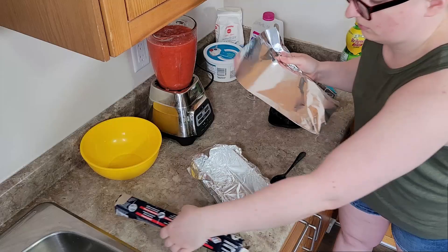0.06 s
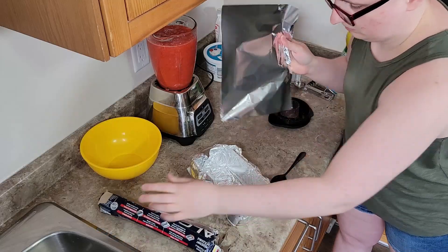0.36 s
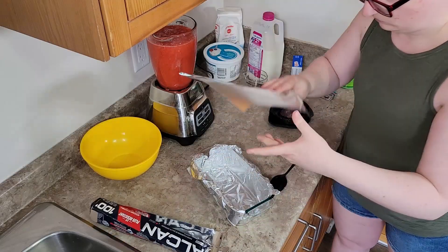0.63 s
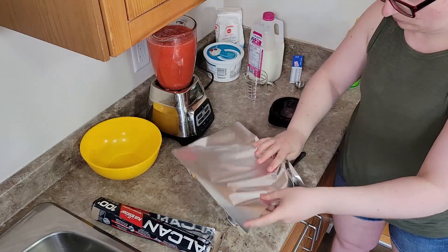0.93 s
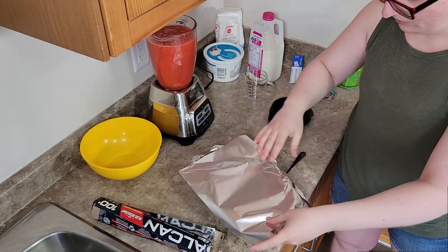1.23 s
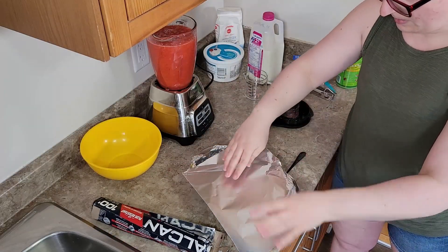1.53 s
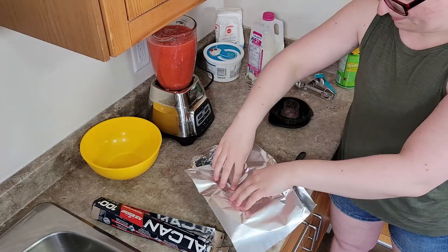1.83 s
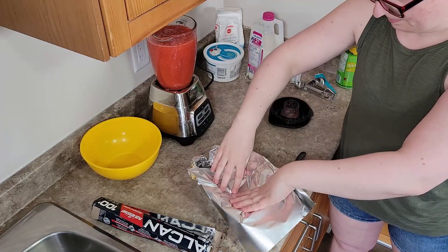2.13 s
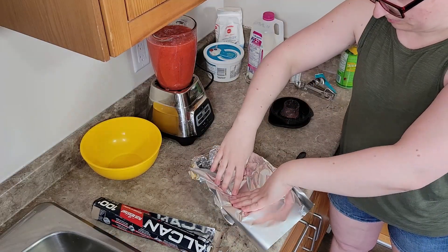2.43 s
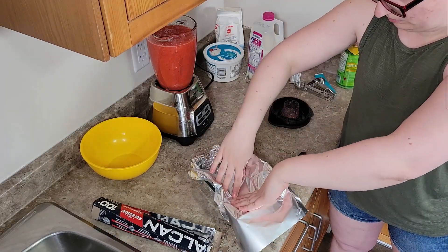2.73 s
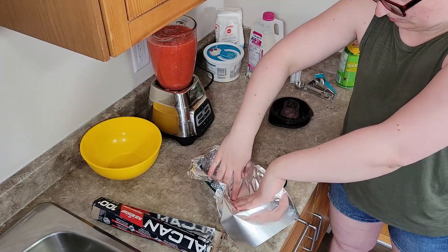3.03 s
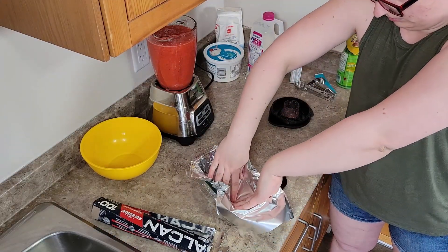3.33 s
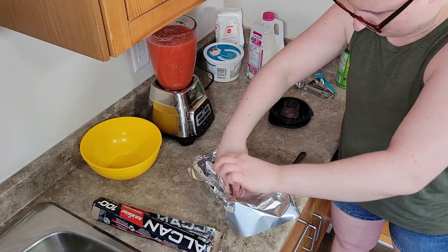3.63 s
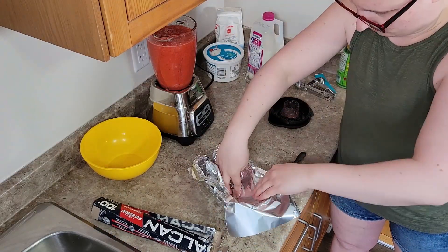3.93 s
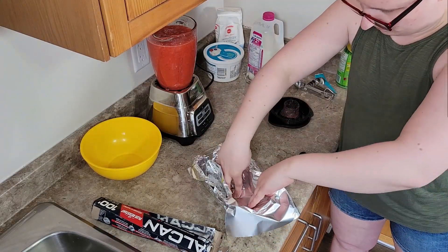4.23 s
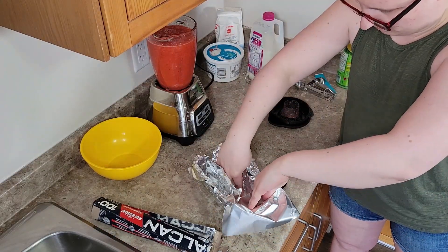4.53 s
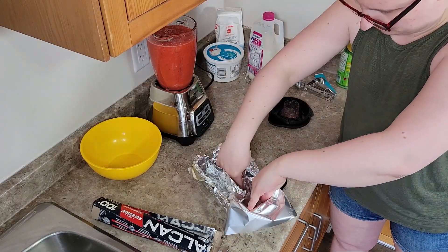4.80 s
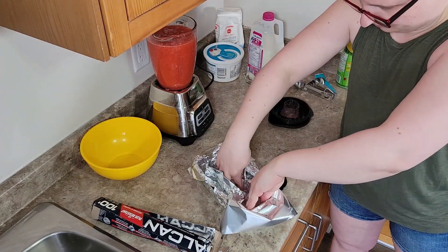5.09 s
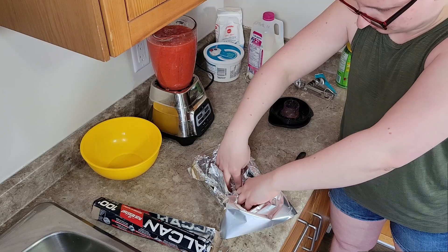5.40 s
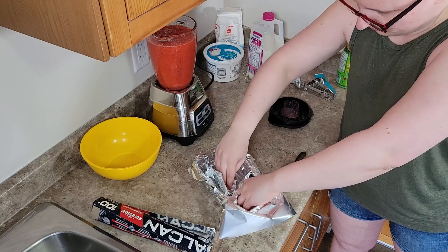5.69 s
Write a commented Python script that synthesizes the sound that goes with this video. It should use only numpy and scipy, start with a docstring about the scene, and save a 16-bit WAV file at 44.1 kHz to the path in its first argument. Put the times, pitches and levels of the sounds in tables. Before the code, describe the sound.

Aluminum foil crinkles and crackles as hands press it over a dish, with a few soft knocks on a kitchen counter.

```python
"""Foil over a baking dish

Close up in a small kitchen, a sheet of aluminium foil is swung over a dish and pressed in by hand.
Creases snap in dense swarms and ring the facets of the sheet; now and then a whole fold buckles.
The cardboard foil box is put down first; later the dish bumps and judders on the counter."""
import sys
import numpy as np
from scipy import signal
from scipy.fft import rfft, irfft
from scipy.io import wavfile
from scipy.ndimage import uniform_filter1d

SR = 44100
rng = np.random.default_rng(int(sys.argv[2]) if len(sys.argv) > 2 else 0)


def transcribe(u):
    """Save the signal u as a 16-bit wav file named by the first command-line argument.

    u: samples, shape (n,) or (channels, n), limited to [-1, 1]; the rate is SR.
    q: integer samples, one column per channel.
    """
    v = np.clip(np.atleast_2d(u).T, -1, 1)
    q = np.round(v * 32767).astype(np.int16)
    wavfile.write(sys.argv[1], SR, q)


N = 262425
HZ = np.fft.rfftfreq(N, 1 / SR)
TOP_HZ = 8950


def gain_of(db):
    """Decibels to amplitude."""
    return 10 ** (np.asarray(db) / 20)


def unit_rms(x):
    """Scales to an rms of one."""
    return x / np.sqrt(np.mean(x ** 2) + 1e-20)


def value_at(points, hz):
    """Reads a table on a log-frequency axis."""
    f, value = np.transpose(points)
    return np.interp(np.log(hz + 1), np.log(f + 1), value)


def add(mix, start_s, sound):
    """Mixes a sound in at its start time."""
    part = mix[max(round(start_s * SR), 0):][:len(sound)]
    part += sound[:len(part)]


def coloured(x, points):
    """Filters x by a table of levels."""
    return irfft(rfft(x) * gain_of(value_at(points, HZ)), N)


def steadied(x, span_s):
    """Takes out swells slower than span_s and leaves the grain."""
    size = int(span_s * SR)
    power = uniform_filter1d(uniform_filter1d(x ** 2, size), size)
    return x / np.sqrt(power + 1e-6 * np.mean(x ** 2))


# Spectrum of the quiet kitchen: frequency_hz, level_db
ROOM_TONE = [(29, -36), (50, -2), (139, -16), (608, -7), (1140, -4), (1240, -23.5), (1450, -6.5),
             (1960, -3.5), (5820, -8.5), (8980, -32), (11700, -63), (19800, -120)]

def room_tone():
    """A faint, steady hiss lies behind everything."""
    return gain_of(-80) * unit_rms(coloured(rng.standard_normal(N), ROOM_TONE))


# Hand strokes that lay the sheet down, press it in, shift the dish and tuck in the edges:
# full_strength_s, rise_20db_s, hold_s, level_db, change_while_held_db, tiny_db, wide_db, push_db
# (the last three are relative to level_db, the level of ordinary creases)
STROKES = [ (.02, 0.2, .13, -72.5, 1.5, -4, -7, -13), (.182, 0.038, 0.194, -42.5, -8.5, -3.5, -8, -11),
           (0.433, 0.026, 0.235, -43.5, -6.5, 0, -14, -20), (.762, 0.0521, .16, -51.5, 1, 0.5, -15, -19.5),
           (1.029, 0.0424, 0.1098, -49, -5.5, 2, -10.5, -15.5),
           (1.21, 1.48, 0.21, -71, -2.5, -3.5, -4, -11), (1.54, 0.1331, .08, -60, -7.5, 2.5, -12.5, -15),
           (1.768, 0.026, 0.157, -42.5, -3.5, 2.5, -7, -9.5),
           (1.91, 0.0423, 0.1297, -49, 2.5, 1.5, -1.5, -9),
           (2.083, 0.048, 0.0864, -53.5, 1, 3, -10.5, -5.5), (2.2, 0.1767, 0.0743, -63, 1, -2.5, -3, -5.5),
           (2.364, 0.0576, 0.0178, -56.5, -3.5, -3.5, -6, -11),
           (2.48, 0.28, 0.074, -64.5, -1.5, -4.5, -5.5, -14.5),
           (2.583, 0.0864, 0.0513, -56.5, 1, -4.5, -6.5, -8),
           (2.684, 0.0112, 0.1472, -49.5, -9, -1.5, -8, -11),
           (2.871, 0.0187, 0.1088, -52, -1.5, -4.5, -4.5, -9), (3.015, 0.02, .22, -49, 1, -1.5, -6, -12.5),
           (3.295, 0.014, .23, -54.5, -17, -3, -3, -11), (3.578, 0.0189, 0.0804, -43.5, -2.5, -3, -13, -9),
           (3.733, 0.0341, 0.0243, -54, -4, 3.5, -7, 0.5), (3.807, 0.07, 0.0196, -50.5, -5, -5, -7, 1),
           (4.034, 0.0223, 0.0316, -41.5, -3, -2, -5, -16.5), (4.203, 0.0146, 0.0549, -52, 5, -.5, -5, -17),
           (4.32, 0.06, 0.033, -62.5, 1.5, -4.5, -3, -11.5),
           (4.363, 0.0014, 0.0557, -48, -2, -1.5, -7, -10), (4.514, 0.0282, 0.026, -55, 1, 1, -8.5, -12.5),
           (4.591, 0.0256, 0.0274, -50.5, -5.5, 4, -6, -13.5), (4.772, .07, .087, -54, 4.5, .5, -7, -17.5),
           (4.961, 0.0707, 0.0681, -43.5, -8, -.5, -8, -10.5),
           (5.14, .014, .054, -48, -4, -3.5, -8.5, -16.5), (5.21, 0.0233, 0.0615, -46.5, -1, -2, -6, -12.5),
           (5.298, 0.0418, 0.173, -45, -6, -2, -8.5, -18), (5.514, 0.11, 0.21, -51, 1, -2, -5.5, -17),
           (5.745, 0.1276, 0.19, -50, -3.5, -4, -4.5, -10.5)]

def hand_strokes(release_db_per_s=240):
    """Each stroke swells, holds and lets go: envelopes for wide panels, creases, tiny creases, push."""
    t = np.arange(0, N / SR, 1 / 1000)
    power = np.zeros((4, len(t)))
    for full_s, rise_s, hold_s, db, change_db, tiny_db, wide_db, push_db in STROKES:
        early = np.maximum(full_s - t, 0)
        held = np.clip((t - full_s) / hold_s, 0, 1)
        late = np.maximum(t - full_s - hold_s, 0)
        stroke = gain_of(db - 20 * early / rise_s + change_db * held - release_db_per_s * late)
        power += np.outer(gain_of([wide_db, 0, tiny_db, push_db]), stroke) ** 2
    return [np.interp(np.arange(N) / SR, t, np.sqrt(p)) for p in power]


def facet_snaps(flurries_per_s, spread_db, flurry_s, median_t60_s, tick, count=6):
    """Each facet snaps back and forth in a flurry, every snap a tick and a brief ring at its pitch."""
    t = np.arange(640) / SR
    draws = rng.random((5000, 3 + 2 * count))[:int(flurries_per_s * N / SR)]
    when, facet, sustain = draws[:, :3].T[:, :, None]
    delay, size = np.split(-np.log(draws[:, 3:]), 2, axis=1)
    pitch_hz = 450 + 8400 * facet
    t60_s = median_t60_s * 4 ** (sustain - .5)
    snaps = np.sin(2 * np.pi * pitch_hz * t) * gain_of(-60 * t / t60_s)
    snaps /= np.linalg.norm(snaps, axis=1, keepdims=True)
    snaps[:, 0] += tick
    heights = gain_of(spread_db * np.minimum(size, 3.5)) * (-1) ** np.arange(count)
    out = np.zeros(N)
    for snap, starts, flurry in zip(snaps, when * N / SR + flurry_s * delay, heights):
        for start_s, height in zip(starts, flurry):
            add(out, start_s, height * snap)
    return out


def near_echoes(x, strength=0.99, fade_s=0.0216, count=24):
    """First echoes off counter, wall and cupboards; their pattern shifts as hands and foil move."""
    out = x.copy()
    for place in range(4):
        delay_s = rng.uniform(.001, .028, count)
        taps = rng.choice([-1, 1], count) * np.exp(-delay_s / fade_s)
        response = np.bincount((delay_s * SR).astype(int), strength * taps / np.linalg.norm(taps))
        crossfade = np.maximum(np.cos(2 * np.pi * (1.3 * np.arange(N) / SR + place / 4)), 0)
        out += signal.oaconvolve(x * crossfade, response)[:N]
    return out


# Resonances of the sheet lying in the dish: pitch_hz, width_hz, level_db
HOLLOW_MODES = [(724, 60, -11), (2107.7, 53, 1), (3580, 80, -4.5), (3927, 160, -1), (5161, 37, 1),
                (6100, 29, -17.5), (6110, 23, -4), (7978, 170, 0)]
# Colour of the foil at the microphone: frequency_hz, level_db
FOIL_SPECTRUM = [(250, -26.5), (430, -15), (700, -3.5), (850, -3.5), (1020, -6.5), (1350, -6), (2000, -1),
                 (2450, -4), (2900, 1.5), (4000, -1.5), (4600, -0.5), (5600, 2), (7500, 1), (8300, -10),
                 (8900, -20)]

def sheet(snaps):
    """Snaps take the colour of the hollow of the dish, the nearest surfaces and the foil."""
    hollow = 1 + sum(gain_of(db) / (1 + 2j * (HZ - hz) / width) for hz, width, db in HOLLOW_MODES)
    return coloured(near_echoes(irfft(rfft(snaps) * hollow, N)), FOIL_SPECTRUM)


def by_size(x):
    """Splits foil sound, low to high, into wide panels, ordinary creases and tiny creases."""
    above = [1 / (1 + (edge_hz / (HZ + 1)) ** 12) for edge_hz in (430, 2450, 5300)]
    return [irfft(rfft(x) * band, N) for band in (above[0] - above[1], above[1] - above[2], above[2])]


def crinkling(envelopes):
    """Creases crackle under the fingers, each size following the strokes."""
    swarm = facet_snaps(flurries_per_s=760, spread_db=2.5, flurry_s=.007,
                        median_t60_s=0.02256, tick=0.651)
    bands = by_size(sheet(swarm))
    return sum(envelope * steadied(band, span_s=0.032) for envelope, band in zip(envelopes, bands))


# Boost or cut of the widest panels: time_s, gain_db
PANEL_GAINS = [(.4, -2.5), (1.0, 1), (1.8, 4), (2.8, 4), (3.6, 0), (4.3, -4), (5.2, -5), (5.9, -1)]

def drumming(foil, below_hz=945):
    """The widest panels drum while the sheet spans the dish and fade as it is crumpled in."""
    lows = irfft(rfft(foil) / (1 + (HZ / below_hz) ** 10), N)
    gain = gain_of(np.interp(np.arange(N) / SR, *np.transpose(PANEL_GAINS)))
    return foil + (gain - 1) * lows


# Rumble of the counter under the dish: frequency_hz, level_db
COUNTER_SPECTRUM = [(40, -23), (75, -20), (110, -3.5), (165, -11), (265, 4), (330, -8), (400, -6),
                    (520, -20), (900, -32.5)]

def counter_rumble(push):
    """Fingers shove the foil against the dish, and the counter rumbles softly."""
    return push * steadied(coloured(rng.standard_normal(N), COUNTER_SPECTRUM), span_s=0.065)


# The foil box lands and settles: start_s, level_db, hardness_db_per_octave
BOX_KNOCKS = [(0.1744, -29.5, 5), (0.1815, -35, 1.5), (0.23, -35.5, 3), (0.2491, -37, 5.5),
              (0.2569, -34, -5.5), (0.2663, -37, 5.5), (.273, -33, 2.5), (0.3, -42.5, -9)]
# Modes of the box: pitch_hz, level_db, t60_s
BOX_MODES = [(105.96, -4, 0.177), (235.1, 2.5, 0.1217), (259.25, -4.5, 0.183), (391, 1, 0.0667),
             (480.3, -18.5, 0.334), (589.5, -15, 0.1176), (645, -8.5, 0.0755), (699.3, -23, 0.222),
             (816.5, -6, 0.058), (904, -6.5, 0.0644), (1429.4, -16, 0.058)]

def box_knocks():
    """Each knock rings the cardboard box; harder corners bring out the upper modes."""
    t, out = np.arange(SR // 2) / SR, np.zeros(N)
    attack = 1 - np.exp(-t / 0.00228)
    for start_s, db, hardness in BOX_KNOCKS:
        ring = sum(gain_of(mode_db + hardness * np.log2(hz / 260) - 60 * t / t60_s)
                   * np.sin(2 * np.pi * hz * t) for hz, mode_db, t60_s in BOX_MODES)
        add(out, start_s, gain_of(db) * ring * attack)
    return out


# Folds that give way: time_s, level_db, pitch_hz, relative_ring_db
FOLDS = [(0.177, -42, 2840, -0.5), (0.233, -43, 2770, -16.5), (0.438, -40, 6630, -10.5),
         (0.49, -47, 6600, 0.5), (0.604, -48.0, 6340, 1.5), (0.845, -51, 4480, -12.5),
         (1.039, -41.0, 6540, -4.5), (1.529, -58.5, 7639, 0.5), (1.745, -55, 7320, -13.5),
         (1.782, -40, 7400, 1), (1.823, -40, 6950, -0.5), (1.907, -42, 2120, -15), (2.01, -49.5, 2600, -11),
         (2.14, -51.0, 6950, -3), (2.329, -57, 3000, -7), (2.686, -53.5, 2610, -5),
         (2.919, -52.5, 6800, -0.5), (3.019, -48.5, 3900, -9.5), (3.123, -50, 6980, -5),
         (3.229, -51.5, 7310, 2.5), (3.593, -40.0, 4527, -2.5), (3.654, -50.5, 7380, 1),
         (3.733, -52.5, 2873, 2.5), (4.029, -42.5, 2500, -13), (4.199, -55.5, 2875, 0.5),
         (4.245, -46.5, 2086, 1.5), (4.357, -52.0, 2950, -1), (4.616, -55.5, 2970, 3.5),
         (4.766, -50, 2740, -2), (4.84, -46, 7040, -10), (4.987, -49.5, 7220, -3), (5.214, -41, 6590, -8),
         (5.377, -41.5, 3900, -12), (5.452, -42, 3890, -4), (5.745, -50.5, 2180, -15.5),
         (5.856, -44.5, 2910, -15)]

def buckling(build_up_s=.009, collapse_s=0.01685):
    """A fold gives way in an avalanche of snaps that builds, dies out and rings it at its own pitch."""
    swarm = facet_snaps(flurries_per_s=780, spread_db=0, flurry_s=.007, median_t60_s=0.024, tick=0.5)
    bands = np.array([steadied(band, span_s=0.0033) for band in by_size(sheet(swarm))])
    out = np.zeros(N)
    for time_s, db, hz, ring_db in FOLDS:
        wide, creases, tiny = bands[:, round(time_s * SR):][:, :SR // 5]
        t = np.arange(len(creases)) / SR
        # a higher fold is a smaller one: fewer wide panels, more tiny creases
        octaves = np.log2(hz / 4570)
        snaps = gain_of(-8 - 4 * octaves) * wide + creases + gain_of(-2 + 8.5 * octaves) * tiny
        ring = signal.lfilter(*signal.iirpeak(hz, Q=16, fs=SR), snaps)
        fold = snaps + gain_of(ring_db) * np.std(snaps) * steadied(ring, span_s=0.0071)
        build_up = 1 - np.exp(-2 * t / build_up_s)
        collapse = np.exp(-np.maximum(t - build_up_s, 0) / collapse_s)
        add(out, time_s - build_up_s / 2, gain_of(db) * build_up * collapse * fold)
    return out


# The dish skids on the counter: start_s, level_db, pitch_hz, length_s, base_t60_s
SKIDS = [(1.037, -48.5, 239.8, 0.0103, 0.136), (1.760, -46, 277.6, 0.078, .1),
         (1.823, -18.5, 255, 0.006, 0.15), (1.967, -40, 270.9, 0.0129, 0.048),
         (2.729, -50.5, 285, 0.0131, 0.101), (3.223, -51, 247, 0.015, 0.088),
         (3.580, -34.5, 248.2, 0.0151, 0.149), (3.632, -29.5, 238.9, 0.0249, 0.015),
         (3.655, -38.5, 275.4, 0.0159, 0.054), (3.709, -38.5, 234, 0.0237, 0.051),
         (3.763, -41, 240.7, 0.024, 0.043), (3.801, -39.5, 241.4, 0.015, 0.187),
         (4.029, -50.5, 266.9, 0.0142, 0.152), (4.533, -57, 235.2, 0.0151, .042),
         (4.945, -54, 272, 0.0102, .066), (5.021, -48.5, 251.3, 0.0256, 0.066),
         (5.188, -53, 255.8, 0.06, 0.078), (5.745, -48.5, 234.4, 0.00778, 0.093)]
# Modes of the counter under the dish, rung by each skid: pitch_ratio, level_db, t60_ratio
COUNTER_MODES = [(.48, -15, 1.7), (.72, -12, 0.703), (1, 1.5, 0.58), (1.15, -16, 1), (1.45, -15.5, 1.46)]

def dish_skids():
    """Friction keeps the counter sounding under the dish, rising a little in pitch as it grips; then it rings
    out."""
    t, out = np.arange(SR // 2) / SR, np.zeros(N)
    grip = 1 - np.exp(-(t / 0.00304) ** 2)
    for start_s, db, hz, length_s, base_t60_s in SKIDS:
        waver = unit_rms(uniform_filter1d(rng.standard_normal(len(t)), size=400))
        cycles = np.cumsum(hz * (1 + 0.04 * waver + 0.044 * np.minimum(t / length_s, 1))) / SR
        decay_db = 60 * np.maximum(t - length_s, 0) / base_t60_s
        ring = sum(gain_of(mode_db - decay_db / t60_ratio) * np.sin(2 * np.pi * ratio * cycles)
                   for ratio, mode_db, t60_ratio in COUNTER_MODES)
        add(out, start_s, gain_of(db) * grip * ring)
    return out


# Reverberation of the small kitchen: frequency_hz, t60_s
KITCHEN_DECAY = [(100, 0.41), (500, 0.83), (2000, 0.1), (5000, 0.33), (9000, 0.29)]

def kitchen_reverb(x):
    """The room returns a diffuse tail, each band dying at its own speed."""
    hz, t, noise = signal.stft(rng.standard_normal(SR * 2 // 3), SR, nperseg=256)
    fade = gain_of(-60 * t / value_at(KITCHEN_DECAY, hz)[:, None]) * (1 - np.exp(-t / 0.0033))
    tail = signal.istft(noise * fade, SR, nperseg=256)[1]
    return signal.oaconvolve(x, tail / np.linalg.norm(tail))[:N]


def scene():
    """Foil, box and dish close to one microphone, with the kitchen well behind them."""
    *envelopes, push = hand_strokes()
    foil = drumming(crinkling(envelopes) + buckling())
    knocks = box_knocks() + dish_skids()
    reverb = kitchen_reverb(gain_of(-16) * foil + gain_of(-21.5) * knocks)
    return (room_tone() + foil + counter_rumble(push) + knocks + reverb)[None]


def record(dry):
    """The mono microphone sheds deep bass, and the treble ends at TOP_HZ."""
    thin = signal.sosfilt(signal.butter(4, 80, "highpass", fs=SR, output="sos"), dry)
    lowpass = signal.firwin(255, TOP_HZ, window=("kaiser", 8), fs=SR)
    return signal.oaconvolve(thin, lowpass[None], "same")


dry = scene()
out = record(dry)
transcribe(out)
```